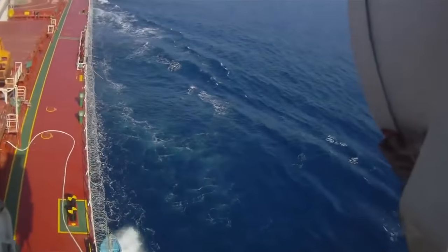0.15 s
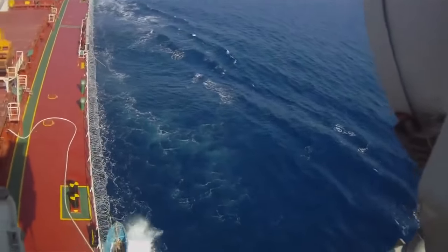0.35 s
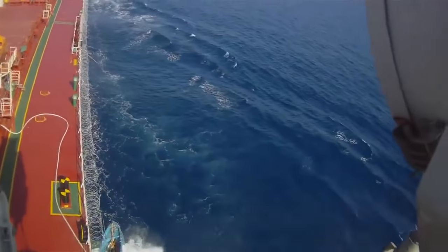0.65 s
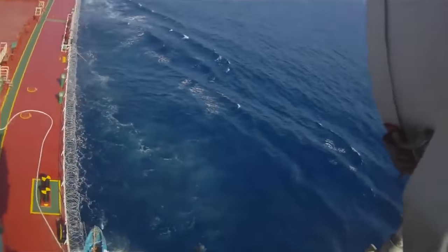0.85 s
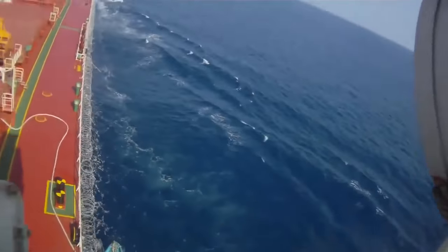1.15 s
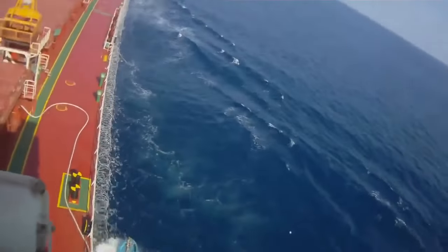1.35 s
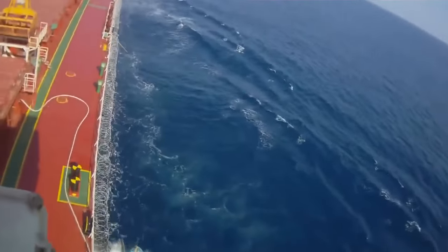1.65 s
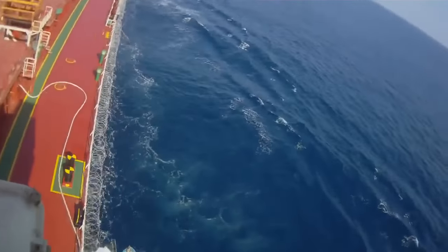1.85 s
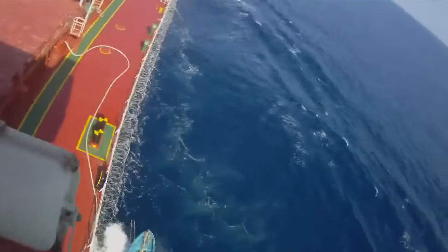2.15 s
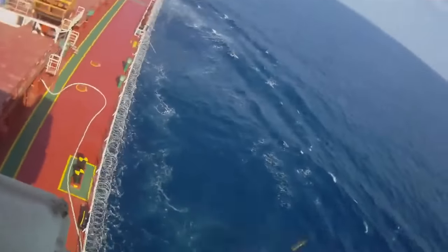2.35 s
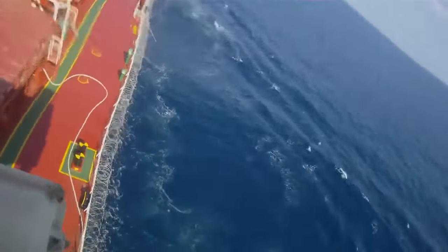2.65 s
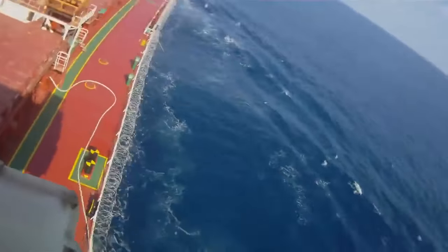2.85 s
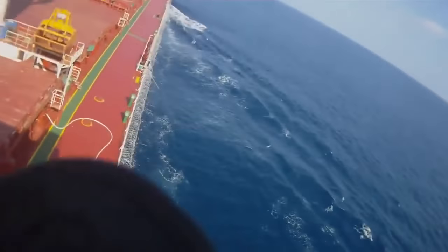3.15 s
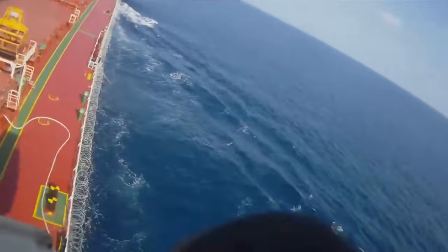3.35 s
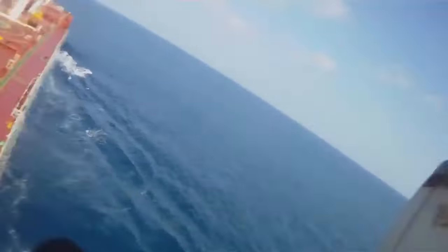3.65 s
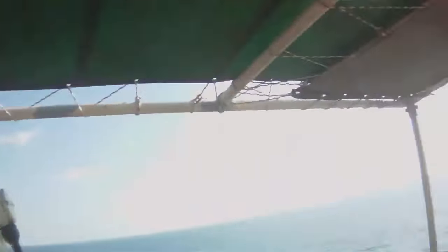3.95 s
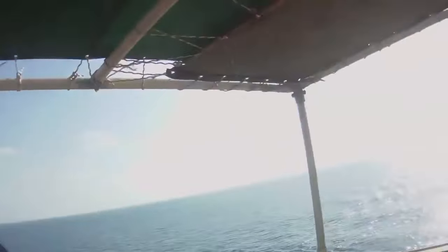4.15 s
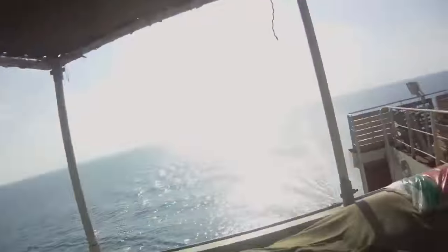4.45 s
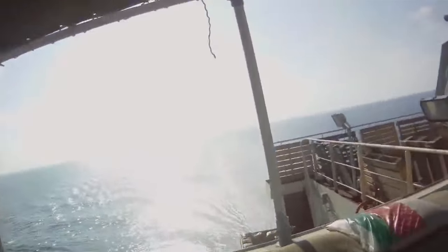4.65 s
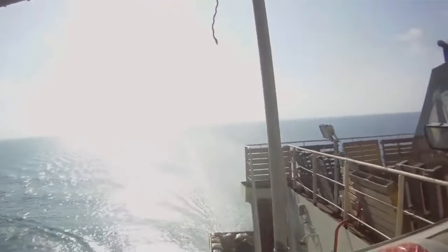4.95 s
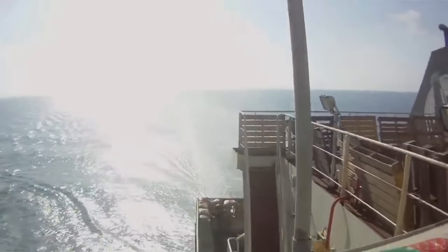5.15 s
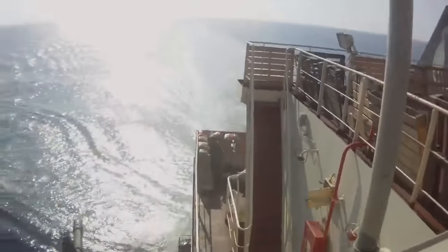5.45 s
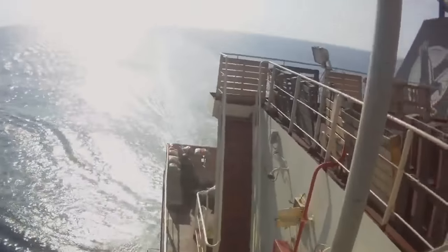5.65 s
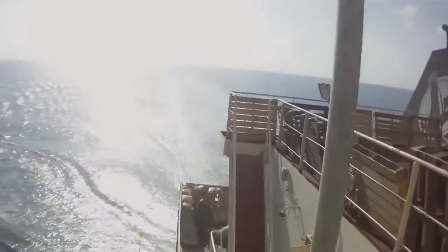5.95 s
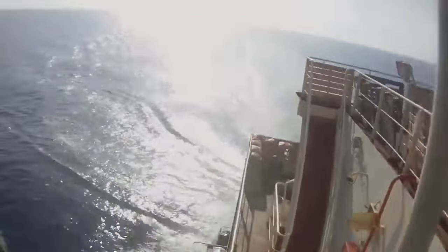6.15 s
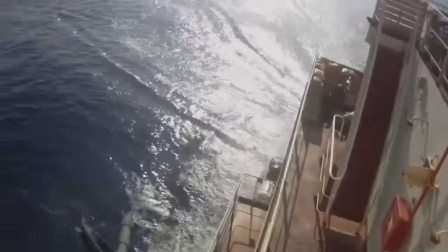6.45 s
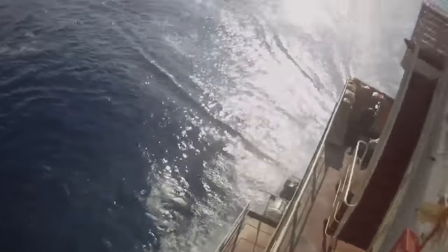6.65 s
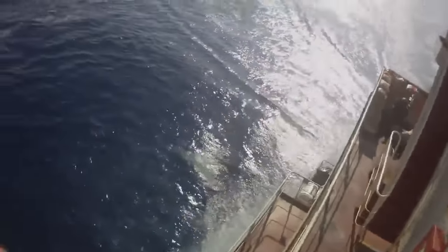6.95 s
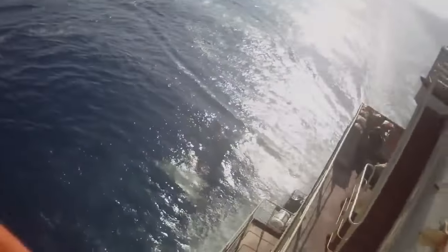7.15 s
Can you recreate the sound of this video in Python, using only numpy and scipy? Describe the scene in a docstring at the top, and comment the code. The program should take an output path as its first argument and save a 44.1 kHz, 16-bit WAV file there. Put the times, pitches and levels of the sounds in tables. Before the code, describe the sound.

Close rifles fire single shots, then a rapid overlapping volley echoing off a steel ship, followed by more distant shots and metal clicks.

```python
"""Rifles fire from the bridge wing of a steel ship, overloading a small microphone worn close by.
Each shot is a clipped crack, a muzzle blast that swings the air pressure up and down,
and a roll of echoes off the hull and the sea. Between bursts, steel parts knock and slide
as a rifle is worked by hand. The sea murmurs underneath."""
import sys
import numpy as np
from scipy import signal
from scipy.io import wavfile
from scipy.ndimage import uniform_filter1d

SR = 44100
rng = np.random.default_rng(int(sys.argv[2]) if len(sys.argv) > 2 else 0)


def transcribe(signal):
    """Save signal, clipped to [-1, 1], as a 16-bit WAV file at the path in sys.argv[1]."""
    frames = np.atleast_2d(signal).T
    limited = np.clip(frames, -1, 1)
    pcm = np.round(limited * 32767).astype(np.int16)
    wavfile.write(sys.argv[1], SR, pcm)


N = 322804

# Tone of the sea, sliding parts, low echoes, high echoes and crack: (frequency [Hz], level [dB])
SEA_TONE = [(12, -36.5), (20, -15), (146, -8), (388, -3), (607, -6.5), (698, -7.5), (976, -17), (1060, -18),
            (1190, -24.5), (2750, -22.5), (3340, -26.5), (4420, -26.5), (5230, -36.5), (8650, -41.5),
            (16000, -70)]
SLIDE_TONE = [(120, -35.5), (200, -15.5), (635, -4.5), (1160, -16), (1590, -10.5), (3370, -1), (4270, -7.5),
              (6760, -8), (9580, -18.5), (14600, -28.5), (16000, -44)]
BOOM_TONE = [(24, -81), (40, -35), (70, -23.5), (185, -8.5), (258, -5.5), (356, 1), (483, 4.5), (695, -1.5),
             (865, -14), (1300, -20.5), (1690, -49), (2860, -120)]
HISS_TONE = [(470, -23), (800, -3.5), (862, -2), (1000, -3.5), (1110, -10.5), (1390, -6), (1970, -7.5),
             (2530, -6), (2770, -8.5), (4080, -7), (5380, -17.5), (6650, -12.5), (9330, -26),
             (14800, -34.5), (16000, -49)]
CRACK_TONE = [(180, -22.5), (300, -3), (584, 4.5), (1030, 6), (1900, 4.5), (2440, 0.5), (4020, -14.5),
              (5340, -7), (7820, -5.5), (9550, -17.5), (12300, -13), (14500, -24), (16000, -30)]
# Loudness of the sea: (time [s], level [dB])
SEA_LEVELS = [(0, -30.5), (.3, -36.5), (2.1, -37.5), (4.802, -39.5), (5.35, -44.5), (6.1, -42), (7.32, -44)]
# Steel rifle parts knocking: (time [s], level [dB], pitch [Hz], length [s], stock knock [dB])
PART_KNOCKS = [(1.502, 0, 3370, 0.0037, -26), (1.5093, -2, 5980, 0.0011, -9), (1.557, -19, 3800, .001, -28),
               (1.571, -9, 3600, 0.0015, -35), (1.572, -13, 5560, 0.0016, -37),
               (1.5926, -14, 3470, 0.0017, -4), (1.6213, -11.5, 4040, 0.00032, -32),
               (1.74, -27.5, 2640, 0.0067, -37), (1.7845, -11.5, 3220, 0.00023, -46),
               (1.829, -20, 3550, 0.0033, -17), (1.8345, -16, 3580, 0.0009, -38),
               (1.852, -26, 3450, 0.0024, -46), (1.951, -2.5, 3470, 0.0019, -10.5),
               (1.989, -14, 2870, 0.0028, -10), (1.9986, -11, 3550, 0.00092, -42),
               (2.045, -34.5, 2500, .003, -50), (7.024, 7, 3150, 0.0016, -24)]
# Metal and cloth sliding: (time [s], length [s], level [dB])
PART_SLIDES = [(1.547, 0.054, -25.5), (1.61, 0.028, -29), (1.697, 0.074, -44.5), (1.806, 0.023, -46),
               (2.002, 0.011, -32), (2.079, 0.035, -40.5), (5.404, 0.081, -37.5), (7.023, 0.023, -21.5),
               (7.059, 0.048, -21.5), (7.106, 0.04, -31), (7.232, 0.033, -11)]
# Steel rails and plates that ring on: (pitch [Hz], width [Hz], level [dB])
RAIL_TONES = [(1900, 120, 0), (2600, 90, 1), (3350, 130, -4)]
# For each rifle: ringing of the rails, relative to its echo treble [dB]
RAIL_LEVELS = {"own": -5, "beside": -12, "far": -25}
# For each rifle, echoes off flat steel, relative to the shot's echo level:
# (delay [s], snap [dB], body [dB], swing [dB])
WALL_ECHOES = {"own": [(.057, 10, -6, 17), (.084, 8.5, -15, -2.5), (.103, 12, 3, 2.5),
               (.14, -18.5, -3, -1.5), (.187, -3.5, 1, 0), (.232, -5.5, -20, -21)],
               "beside": [(.04, 6.5, -8, 2.5), (.055, 18.5, 7, 13.5), (.105, -3.5, 4.5, 4.5)],
               "far": [(.04, -1, -7, 0.5), (.062, 8, 15, -5)]}
# Other strong echoes and faint far shots: (time [s], snap [dB], body [dB], swing [dB])
LONE_ECHOES = [(0.056, -25, -8, -18), (0.689, -20, -1, -2), (1.05, -20, -3, -4), (1.1498, -20, -22, -30),
               (2.144, 1.5, -15, -6), (2.2082, -4, -5.5, -20), (2.3128, 3, -20, -8), (2.4325, 3, -5, -8),
               (2.6506, 0.5, -10, -13), (2.7355, -15, -3, 3), (2.7624, -2.5, 3, -13), (2.8587, 6.5, -2, -3),
               (2.917, -2, -13, -12), (3.0985, -1.5, -22, -17), (3.189, -6, -15, -4), (3.274, -15, -15, 3),
               (3.2919, -2, -2, -20), (3.5755, -10, -3, 1.5), (3.8745, -12, -20, 1.5),
               (4.079, -13, -11, -20), (4.235, -8, -4, -3), (4.638, -12, -30, -30), (4.745, -27, -32, -40),
               (4.778, -45, -20, -40), (4.847, -40, -21, -40), (4.9116, -28.5, -30, -40),
               (4.974, -38, -24, -40), (5.0865, -37, -26, -40), (5.174, -40, -24, -40),
               (5.243, -35, -25, -40), (5.7075, -16, -36, -40), (7.2822, 1, -2, -10)]
# For each rifle: stray pressure swings, relative to the shot's echo level [dB]
STRAY_LEVELS = {"own": 8, "beside": 4, "far": -16}
# For each rifle: (recoil thump [dB], crack pitch [Hz], trail relative to crack [dB], blast pitch [Hz],
# lull before the echoes [0-1], treble relative to echo [dB], echo hold [s])
RIFLE_VOICES = {"own": (-17.5, 3297.5, -9.5, 476, 0, -9.5, 0.1517),
                "beside": (-34, 3044.5, -3.5, 478.5, 0.2, -6.5, 0.1417),
                "far": (-62, 3643, -6.5, 394, 0.14, -4, 0.0248)}
# For each rifle's crack: (width of its ring [Hz], amount of wide noise [gain])
CRACK_BLENDS = {"own": (4000, 0.58), "beside": (3340, 0.61), "far": (2400, 0.4)}
# The shots: (time [s], rifle [name], crack [dB], crack length [s], blast lag [s], blast [dB], echo [dB],
# rough time for the echo to fall 60 dB [s], boost from facing the walls [dB],
# extra wall delay as the shooter moves [s])
GUNSHOTS = [(0.0541, "far", -19.5, 0.0024, .0036, -5.5, -27.5, 0.12, -10, .0001),
            (0.502, "own", -5.5, 0.0026, .0084, 18, -13.5, 0.43, 1, 0.0072),
            (0.848, "own", -4.5, 0.0026, 0.0016, -20, -14, 0.61, 3, 0.0034),
            (0.861, "beside", -4, 0.004, 0.00027, 8.5, -16.5, .3, -9, -0.0087),
            (1.2, "own", -2.5, 0.0046, 0.0028, 1.5, -14, 0.46, 4.5, 0.0012),
            (2.118, "beside", -10, 0.0053, 0.0049, -0.5, -15, 0.47, 2.5, 0.00094),
            (2.134, "beside", -14.5, 0.00099, 0.00024, -7, -26, 0.51, -8, 0.019),
            (2.276, "beside", -5.5, 0.0034, 0.00012, 3.5, -17, .4, -11, 0.00021),
            (2.351, "own", 7, 0.0064, 0.00066, 33, -14, 0.46, -2.5, -0.0022),
            (2.46, "beside", -2, 0.0045, .003, 13, -13.5, 0.3, 0, 0.0015),
            (2.621, "beside", -12, .0029, 0.00043, -5, -22.5, 0.68, 0.5, -0.0027),
            (2.681, "own", 2.5, 0.0063, 0.00071, 33, -13, 1.3, -13, -0.0014),
            (2.834, "beside", -6, 0.0073, 0.0036, 16, -18, .45, 2.5, 0.0023),
            (2.939, "own", -3.5, 0.004, 0.00077, 8, -21.5, 0.25, 1, 0.0045),
            (2.975, "beside", -11, 0.0081, 0.00015, -17.5, -15.5, 0.49, -1, .003),
            (3.169, "own", -2, 0.0033, 0.0005, 0, -15.5, 0.6, -12, -0.0059),
            (3.213, "beside", 2, 0.0043, 0.00025, 24.5, -16, 0.66, -16, -0.0088),
            (3.476, "own", -6, 0.006, 0.0019, -0.5, -15, 0.75, -15, -0.004),
            (3.492, "beside", -5.5, 0.0027, 0.00015, 8.5, -22, 2.5, -3, -0.023),
            (3.742, "beside", -10, 0.0042, 0.0048, 0, -17, 0.43, -2, -0.0018),
            (3.818, "own", 3, 0.006, .001, 28, -16, 0.4, -3.5, .0005),
            (3.997, "beside", -7, 0.0058, 0.00015, 8, -13, 0.95, -5, -0.0018),
            (4.127, "own", -4, 0.0036, .001, 7, -21.5, .65, 2.5, -0.011),
            (4.394, "own", -8, 0.0022, 0.0024, -11, -15.5, 0.53, 0, -0.0015),
            (5.439, "far", -21, 0.0054, 0.0014, 8, -15.5, 0.51, 0, -0.0086),
            (5.538, "far", -9, 0.0077, 0.014, 20, -17.5, 0.59, 5, -0.0036),
            (6.136, "far", -8.5, .0092, 0.016, 2, -13, 0.53, 1, 0.0043),
            (6.25, "far", -8.5, 0.0057, 0.02, 7, -15, .4, 1, -0.0049),
            (6.744, "far", -8.5, 0.0035, 0.0066, 4, -15.5, .3, -5, 0.0037),
            (6.84, "far", -9, 0.011, 0.022, -4, -13.5, 0.45, -2, 0.01),
            (7.245, "far", -12.5, 0.011, 0.015, -8, -16.5, 1.5, -5, 0.0064)]
# Ring of the microphone's case: (pitch [Hz], width [Hz], level [dB])
CASE_RING = (2398, 200, -15)


def amp(db):
    """Turns decibels into a gain."""
    return 10 ** (np.asarray(db) / 20)


def clock(seconds):
    """The time of each sample, in seconds."""
    return np.arange(round(seconds * SR)) / SR


def evened(x):
    """Scales a sound to an average (rms) size of 1."""
    return x / np.sqrt(np.mean(x ** 2) + 1e-20)


def add(mix, start, sound):
    """Mixes a sound in at start seconds."""
    part = mix[max(round(start * SR), 0):][:len(sound)]
    part += sound[:len(part)]


def coloured(x, tone):
    """Gives a sound the tone in a table, with no ringing ahead of a click."""
    table_hz, table_db = np.transpose(tone)
    hz = abs(np.fft.fftfreq(8192, 1 / SR))
    db = np.interp(np.log(hz + 1), np.log(table_hz + 1), table_db)
    log_gain = np.log(amp(np.maximum(db, -100)))
    taps = np.fft.ifft(np.exp(np.conj(signal.hilbert(log_gain)))).real[:4096]
    return evened(signal.oaconvolve(x, taps)[:len(x)])


def grains(per_s, spread_db):
    """Scattered clicks; a few are much louder, or quieter if the spread is negative."""
    present = rng.random(N) < per_s / SR
    size = amp(spread_db * np.minimum(rng.exponential(1, N), 4))
    return present * size * rng.choice([-1., 1.], N)


def lumps(seconds):
    """A random wobble that changes over about this time."""
    size = round(seconds * SR)
    return evened(uniform_filter1d(uniform_filter1d(rng.standard_normal(N), size), size))


def burst(length, rise, fall):
    """A loudness shape that rises, holds and fades (times in seconds)."""
    t = clock(.15)
    return (1 - np.exp(-t / rise)) * np.exp(-np.maximum(t - length, 0) / fall)


def band_noise(noise, hz, width):
    """Makes noise ring around one pitch."""
    radius = np.exp(-np.pi * width / SR)
    poles = [1, -2 * radius * np.cos(2 * np.pi * hz / SR), radius * radius]
    return evened(signal.lfilter([1, -1], np.convolve(poles, poles), noise))


def knock(detune, hz, t60):
    """A dull knock near hz that falls 60 dB in t60 seconds."""
    t = clock(.06)
    return -np.sin(2 * np.pi * hz * (1 + .14 * detune) * t) * amp(-60 * t / t60)


def sea():
    """Water along the hull and the last far echoes blend into a low, uneven murmur."""
    db = np.interp(np.arange(N) / SR, *np.transpose(SEA_LEVELS))
    return amp(db + 1.3 * lumps(.019)) * coloured(rng.standard_normal(N), SEA_TONE)


def rifle_handling():
    """Steel parts snap and ring over a dull knock of the stock; sliding parts hiss."""
    knocks, rattle, slide = np.zeros((3, N))
    t = clock(.1)
    for start, db, hz, length, stock_db in PART_KNOCKS:
        noise = rng.standard_normal(len(t))
        envelope = amp(db) * burst(length, rise=.0003, fall=.0022)[:len(t)]
        ring = .76 * band_noise(noise, hz, width=1100) + .5 * np.sin(2 * np.pi * hz * t)
        add(knocks, start, envelope * ring)
        add(rattle, start, envelope * .26 + amp(db) * .3 * np.exp(-t / .00042))
        add(knocks, start + .00366, amp(stock_db) * knock(noise[0], hz=510, t60=.016))
    for start, length, db in PART_SLIDES:
        add(slide, start, amp(db) * burst(length, rise=.0058, fall=.0034))
    rattle *= coloured(rng.standard_normal(N), CRACK_TONE)
    slide *= amp(3 * lumps(.0076))  # the parts catch and let go
    slide *= coloured(grains(per_s=3500, spread_db=-4), SLIDE_TONE)
    return knocks + rattle + slide


def rolling_echoes():
    """Echoes hold while the hull answers, then die, treble first; the rails ring on."""
    t = clock(1.5)
    powers, rail_power = np.zeros((3, N)), np.zeros(N)
    for start, rifle, *_, echo_db, t60, _, _ in GUNSHOTS:
        *_, lull, treble_db, hold = RIFLE_VOICES[rifle]
        build = 1 - np.clip(lull, 0, 1) * np.exp(-(t / .097) ** 2)
        hiss_db = echo_db + treble_db
        # low, middle, high: (level [dB], fade speed [factor], far tail [dB], tail's 60 dB fall [s])
        bands = [(echo_db, .95, -17, 1.5), (hiss_db, 1.05, -15, 1.1), (hiss_db, 1.15, -16, .8)]
        for power, (db, speed, far_db, far_t60) in zip(powers, bands):
            near = amp(-60 * np.maximum(t - hold, 0) * speed / t60)
            far = amp(far_db - 60 * t / far_t60)
            add(power, start, (amp(db) * build) ** 2 * (near ** 2 + far ** 2))
        add(rail_power, start, amp(hiss_db + RAIL_LEVELS[rifle] - 60 * t / 1.3) ** 2)
    # the walls answer in clumps
    boom = coloured(grains(per_s=2500, spread_db=3), BOOM_TONE) * amp(.98 * lumps(.022))
    hiss = coloured(grains(per_s=9000, spread_db=1.5), HISS_TONE) * amp(1.1 * lumps(.013))
    rails = sum(amp(db) * band_noise(rng.standard_normal(N), hz, width) for hz, width, db in RAIL_TONES)
    middle = signal.sosfiltfilt(signal.butter(4, 5000, fs=SR, output="sos"), hiss)
    spike = (1 - t[:200] / .00099) * np.exp(-t[:200] / .00054)  # one sharp reflection
    crackle = evened(signal.oaconvolve(grains(per_s=440, spread_db=-3), spike)[:N])
    roll = np.sqrt(powers) * [boom, middle + .11 * crackle, hiss - middle]
    return roll.sum(0) + np.sqrt(rail_power) * evened(rails)


def single_echoes():
    """Lists each wall's answer to each shot, then the lone echoes, all in the same columns."""
    echoes = []
    for start, rifle, *_, echo_db, _, facing_db, shift in GUNSHOTS:
        chances_db = -.9 * rng.standard_normal(8)  # walls answer a little differently each time
        for (delay, *levels), chance_db in zip(WALL_ECHOES[rifle], chances_db):
            levels_db = echo_db + facing_db + chance_db + np.array(levels)
            echoes.append((start + delay + shift, *levels_db))
    return echoes + LONE_ECHOES


def wall_slaps(echoes):
    """Flat steel throws back a rounder copy of a shot; faint, far ones are smeared and dull."""
    bodies, near, far = np.zeros((3, N))
    for arrival, snap_db, body_db, _ in echoes:
        start = arrival - .001
        distance = np.clip(-snap_db / 30, 0, 1)
        shape = burst(.0017 + .0028 * distance, rise=.0019, fall=.0053 + .0079 * distance)
        snap = amp(snap_db) * .38 * shape
        add(near, start, snap * (1 - distance))
        add(far, start, snap * distance)
        add(bodies, start, amp(body_db) * .36 * knock(rng.standard_normal(), hz=477, t60=.028))
    bright = coloured(rng.standard_normal(N), HISS_TONE)
    dull = signal.lfilter(*signal.butter(2, 4500, fs=SR), bright)
    return bodies + near * bright + far * dull


def blast_echoes(echoes):
    """The blast comes back as a pressure swing or two: once per single echo, plus two strays a shot."""
    swings, t = np.zeros(N), clock(.15)
    arrivals = [(start + .004016, db) for start, *_, db in echoes]
    lateness = rng.random((len(GUNSHOTS), 2))
    for (start, rifle, *_, echo_db, _, _, _), late in zip(GUNSHOTS, lateness):
        stray_db = echo_db + STRAY_LEVELS[rifle] - 5.5 * late + 5.5 * rng.standard_normal(2)
        arrivals += zip(start + .027 + .173 * late, stray_db)
    for start, db in arrivals:
        hz = rng.uniform(280, 600)
        envelope = amp(db) * 3 * np.exp(-(t / .0021) ** 2)
        add(swings, start - .0012, envelope * np.sin(2 * np.pi * hz * t))
    return swings


def cracks():
    """Each shot starts with a sharp snap of ringing noise and a weaker trail."""
    snaps, t = np.zeros(N), clock(.15)
    wide_noise = coloured(rng.standard_normal(N), CRACK_TONE)
    for start, rifle, db, length, lag, *_ in GUNSHOTS:
        _, hz, trail_db, *_ = RIFLE_VOICES[rifle]
        width, wide_gain = CRACK_BLENDS[rifle]
        trail = amp(trail_db) * burst(lag + .0073, rise=.002, fall=.0025)  # lasts past the blast's arrival
        envelope = burst(length, rise=.0004, fall=.0015) + trail
        ring = band_noise(rng.standard_normal(len(t)), hz, width)
        wide = wide_noise[round(start * SR):].take(np.arange(len(t)), mode="wrap")
        add(snaps, start, amp(db) * 1.54 * envelope * (.56 * ring + wide_gain * wide))
    return snaps


def rifle_fire(echoes):
    """Cracks and muzzle blasts overload the microphone. Also gives the gain left for weaker sounds."""
    blasts, thumps, stun = np.zeros((3, N))
    t = clock(.15)
    for start, rifle, _, _, lag, blast_db, *_ in GUNSHOTS:
        thump_db, _, _, hz, *_ = RIFLE_VOICES[rifle]
        add(thumps, start, amp(thump_db) * 4.4 * (1 - t / .0029) * np.exp(-t / .0014))  # recoil
        strength = amp(blast_db)
        envelope = strength * np.exp(-(t / .0044) ** 3) + min(strength, 2.5) * np.exp(-t / .0016)
        add(blasts, start + lag, -envelope * np.sin(2 * np.pi * hz * t))
        add(stun, start + lag, strength * np.exp(-t / .018))
    heard_cracks = cracks() / (1 + .14 * stun)  # a heavy blast deafens the microphone to the trail
    flattened = np.tanh(blasts + blast_echoes(echoes) + heard_cracks)
    bass_cut = np.exp(-2 * np.pi * 760 / SR)  # turns the flattened swings into spikes
    spikes = 1.05 * signal.lfilter([1, -1], [1, -bass_cut], flattened)
    recovery = np.exp(-1 / (.054 * SR))
    strain = signal.lfilter([1 - recovery], [1, -recovery], flattened ** 2)
    return spikes + thumps, 1 / (1 + 6 * strain)


def scene():
    """Everything meets at one microphone; the shots push the echoes and the sea down."""
    echoes = single_echoes()
    fire, gain = rifle_fire(echoes)
    background = rolling_echoes() + wall_slaps(echoes) + sea()
    return (fire + gain * background + rifle_handling())[None]


def record(dry):
    """The microphone's case rings faintly; its electronics hiss, clip and cut the highest treble."""
    hz, width, db = CASE_RING
    ring = amp(db) * 2 * signal.lfilter(*signal.iirpeak(hz, hz / width, SR), dry)
    hiss = amp(-77) * rng.standard_normal(N)
    heard = dry + hiss + ring
    clipped = heard / (1 + abs(heard / .93) ** 10) ** (1 / 10)
    treble_cut = signal.firwin(255, 15950, window=("kaiser", 9), fs=SR)
    return signal.oaconvolve(clipped, treble_cut[None], "same")


dry = scene()
out = record(dry)
transcribe(out)
```